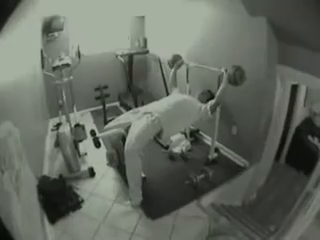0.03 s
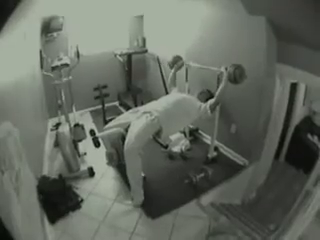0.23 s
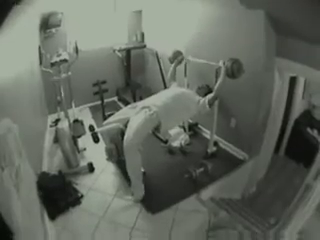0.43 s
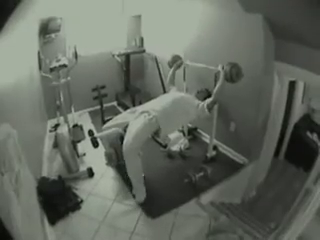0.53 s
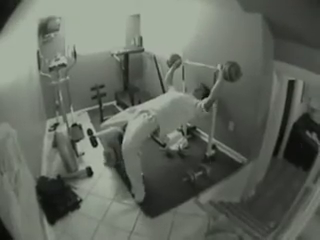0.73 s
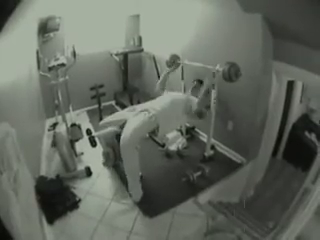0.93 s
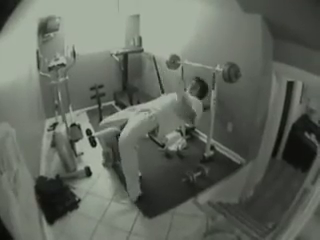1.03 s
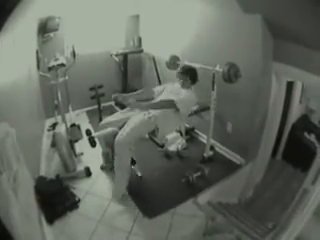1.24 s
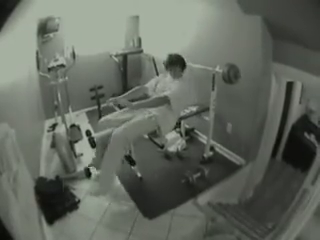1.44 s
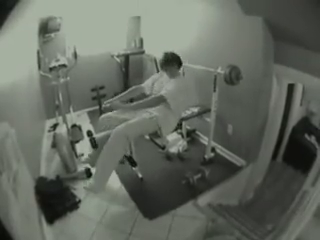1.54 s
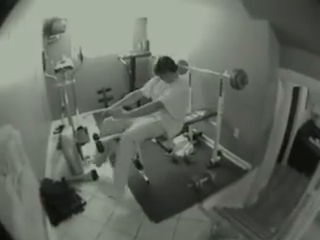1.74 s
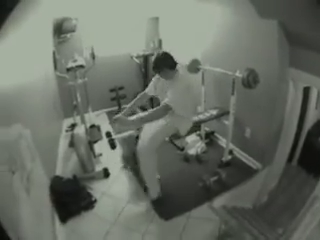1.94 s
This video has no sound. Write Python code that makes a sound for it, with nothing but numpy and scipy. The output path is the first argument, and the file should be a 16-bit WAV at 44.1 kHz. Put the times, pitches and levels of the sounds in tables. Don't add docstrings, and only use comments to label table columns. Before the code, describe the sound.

A heavy barbell slams into steel rack hooks, bouncing and clashing its plates, then rings briefly; cloth slides on a pad and a shoe scuffs and lands on tile, in a small reverberant room, distant microphone.

```python
import sys
import numpy as np
from scipy import signal
from scipy.fft import rfft, irfft, next_fast_len
from scipy.io import wavfile
from scipy.ndimage import uniform_filter1d, minimum_filter1d, map_coordinates

SR = 44100
rng = np.random.default_rng(int(sys.argv[2]) if len(sys.argv) > 2 else 0)


def pcm_store(signal):
    levels = np.round(np.clip(np.atleast_2d(signal), -1, 1) * 32767)
    wavfile.write(sys.argv[1], SR, levels.astype(np.int16).T)


def volts_from_decibels(level):
    exponent = np.asarray(level, float) / 20
    return 10 ** exponent


N = 88200

# (frequency [Hz], width [Hz], level [dB])
HOOK_BODY = [(733, 387, 3.5), (1690, 995, 2), (2630, 485, 4), (3230, 890, -0.5), (4190, 1300, -3),
             (5440, 1100, -7.5), (7100, 2900, -14.5)]
# (frequency [Hz], level [dB], t60 [s])
RACK_MODES = [(95, -18, .12), (231, -9, .12), (330, -10, .1), (500, -9, .1), (605, -9, .15), (651, -9, .15),
              (764, -5, .15), (868, -9, .1), (951, -6, .15), (1023, -7, .15), (1110, -6, .08),
              (1200, -10, .15), (1513, -16, .1), (1814, -14, .1)]
# (frequency [Hz], level [dB], t60 [s])
LARGE_PLATE = [(1780, -13, .12), (1869, 0, .36), (2120, -11, .4), (3280, -20, .4), (3748, -12, .45),
               (3915, -11, .4), (5450, -8, .04), (6078, -20, .3), (7897, -22, .2)]
LARGE_SCATTER_DB = 1


def unit(x):
    return x / np.sqrt(np.mean(x ** 2) + 1e-20)


def along(points, hz):
    f, v = np.transpose(points)
    return np.interp(np.log(hz + 1), np.log(f + 1), v)


def level(rows):
    return volts_from_decibels(np.interp(np.arange(N) / SR, *np.transpose(rows)))


def wobble(rate):
    points = rng.standard_normal(int(N * rate / SR) + 4)
    return map_coordinates(points, [np.arange(N) * rate / SR])


def filtered(x, response):
    m = next_fast_len(x.shape[-1] + SR // 2)
    spectrum = rfft(x, m) * response(np.fft.rfftfreq(m, 1 / SR))
    return irfft(spectrum, m)[..., :x.shape[-1]]


def peaks(table):
    def response(f):
        total = 0
        for k, (centre, width, db) in enumerate(table):
            band = 1j * f * width / (centre ** 2 - f ** 2 + 1j * f * width)
            total = total + (-1) ** k * volts_from_decibels(db) * band
        return total
    return response


def ring(modes, scatter_db=3.5, attack_s=0.0002):
    hz, db, t60 = np.array(modes).T[:, :, None]
    t = np.arange(SR // 2) / SR
    level_luck, pitch_luck = rng.standard_normal((2, len(modes), 1))
    sines = np.sin(2 * np.pi * hz * t * (1 + 0.001 * pitch_luck) + 3 * pitch_luck)
    decays = volts_from_decibels(db + scatter_db * level_luck - 60 * t / t60)
    return (decays * sines).sum(0) * (1 - np.exp(-t / attack_s))


def add(track, s, sound):
    part = track[SR + round(s * SR):][:len(sound)]
    part += sound[:len(part)]


def burst(t60):
    return volts_from_decibels(-60 * np.arange(2000) / SR / t60) * rng.standard_normal(2000)


def snaps_on(rows, gain_db, t60, body):
    out = np.zeros(SR + N)
    for s, db in rows:
        add(out, s, volts_from_decibels(db + gain_db) * burst(t60))
    return filtered(out, peaks(body))


def knocks(rows, modes, attack_s):
    out = np.zeros(SR + N)
    for s, db in rows:
        add(out, s, volts_from_decibels(db - 1.5) * ring(modes, scatter_db=0.5, attack_s=attack_s))
    return out


def paired(pair, alike):
    def split(hz):
        angle = np.arccos(np.clip(along(alike, hz), -1, 1)) / 2
        return np.array([np.cos(angle), np.sin(angle)])
    mid, side = filtered(pair, split)
    return np.array([mid + side, mid - side])


def rush(spectrum, patchy_db, channels=1):
    z = signal.stft(rng.standard_normal((channels, N + 512)), nperseg=512)[2]
    field = uniform_filter1d(rng.standard_normal(z.shape[1:]), 5, 0)
    field = uniform_filter1d(field, 8, 1)
    x = signal.istft(z * volts_from_decibels(patchy_db * unit(field)), nperseg=512)[1][:, :N]
    return unit(filtered(x, lambda hz: volts_from_decibels(along(spectrum, hz))))


def hush():
    # (frequency [Hz], density [dB per Hz])
    air_colour = [(20, -25), (46, 3.5), (80, -11.5), (237, -8), (431, -14), (1880, -20.5), (3250, -26.5),
                  (15000, -39)]
    # (frequency [Hz], likeness [0-1])
    air_alike = [(40, 0.48), (200, 0.96), (1600, 0.54), (5000, 1), (14000, 0.093)]
    t = np.arange(N) / SR
    hum_phase = 2 * np.pi * 290.7 * t + 0.8 * wobble(7.2)
    hum = volts_from_decibels(-48 + 1.2 * wobble(14.5)) * np.sin(hum_phase)
    sing = volts_from_decibels(-46 - 40 * t) * np.sin(2 * np.pi * 3490 * t)
    air = paired(rush(air_colour, patchy_db=1.5, channels=2), air_alike)
    return volts_from_decibels(-46.5 + 3.9 * wobble(4.25)) * air + hum + sing


def hook_blows():
    # (time [s], crack [dB], rack ring [dB], hook ping [dB])
    blows = [(-.04, -15.5, -11, -43), (.151, -1.5, -3, -8), (.255, -27, -13, -14), (.296, -5.5, -7, -9),
             (.318, -9.5, -11, -31), (.374, -7, -14.5, -16.5), (.406, -4, -39, -8), (.449, -5, -19, -38),
             (.454, -6.5, -34, -39), (0.489, -12.5, -22, -37), (.527, -8.5, -15.5, -34),
             (.56, -12.5, -23.5, -31), (.639, -18, -23, -24.5)]
    # (frequency [Hz], level [dB], t60 [s])
    ping = [(2450, 0, .035)]
    cracks, rack, pings = np.zeros((3, SR + N))
    for s, crack_db, rack_db, ping_db in blows:
        add(cracks, s, volts_from_decibels(crack_db + 7) * burst(0.048))
        add(rack, s, volts_from_decibels(rack_db - 7.5) * ring(RACK_MODES, scatter_db=2.5))
        add(pings, s, volts_from_decibels(ping_db) * ring(ping, scatter_db=0))
    return rack + filtered(cracks, peaks(HOOK_BODY)), pings


def plate_clashes():
    # (time [s], large plate [dB], small plate [dB])
    clashes = [
        (-.04, -19.5, -27),
        (0.162, -12, -33),
        (0.256, -17, -30),
        (0.303, -16, -35),
        (.451, 1.5, -12),
        (0.489, -16, -24),
        (0.528, -31, -31),
        (.55, -19, -12.5),
        (.62, -28, -22),
    ]
    # (frequency [Hz], level [dB], t60 [s])
    small_plate = [(2525, -8, .25), (2590, -6, .25), (2650, 0, .3), (3708, -10, .3), (4175, -10, .15),
                   (4786, -6, .25)]
    out = np.zeros(SR + N)
    for s, large_db, small_db in clashes:
        large = volts_from_decibels(large_db - 9.5) * ring(LARGE_PLATE, scatter_db=LARGE_SCATTER_DB)
        small = volts_from_decibels(small_db - 10) * ring(small_plate, scatter_db=5)
        add(out, s, large + small)
    return out


def plate_rattle():
    # (time [s], level [dB])
    chatter_curve = [(0, -43.5), (.14, -90), (.16, -25), (.3, -27), (.44, -26), (.465, -18), (.58, -24.5),
                     (.7, -39), (.85, -48), (1.0, -92)]
    touches_per_s, scatter_db = 900, 3
    touches = (rng.random(N) < touches_per_s / SR) * volts_from_decibels(scatter_db * np.tanh(rng.standard_normal(N)))
    touch_decay = volts_from_decibels(-60 * np.arange(400) / SR / 0.012)
    chatter = np.convolve(touches, touch_decay)[:N] * rng.standard_normal(N)
    chatter = np.pad(unit(chatter) * level(chatter_curve), (SR, 0))
    plate_ring = volts_from_decibels(-6.5) * ring(LARGE_PLATE, scatter_db=LARGE_SCATTER_DB)
    metal = plate_ring + ring(RACK_MODES, scatter_db=1)
    ringing = signal.fftconvolve(chatter, metal)[:SR + N]
    return filtered(volts_from_decibels(10) * chatter, peaks(HOOK_BODY)) + volts_from_decibels(-39.5) * ringing


def frame_rocks():
    # (time [s], level [dB])
    foot_knocks = [(-.01, -25), (.085, -30), (.17, -13), (.21, -33), (.325, -7.5), (.385, -13.5),
                   (.418, -12), (.508, -11), (.588, -13.5), (.648, -19.5), (.79, -45)]
    # (frequency [Hz], level [dB], t60 [s])
    frame_modes = [(183, -12, 0.075), (245, -2.5, 0.078), (335.5, 1.5, 0.057), (361, 0, 0.09),
                   (424.3, 0, 0.051), (690, -6, 0.065)]
    return knocks(foot_knocks, frame_modes, attack_s=0.0019)


def collar_clinks():
    # (time [s], level [dB])
    clinks = [
        (-.01, -39),
        (.153, -18),
        (.17, -25),
        (.3, -21),
        (.495, -16),
        (.525, -13),
        (.645, -28.5),
    ]
    # (frequency [Hz], level [dB], t60 [s])
    collar_modes = [(769, -3.5, 0.28), (1206, 1, 0.08), (973, 2, .1)]
    return knocks(clinks, collar_modes, attack_s=0.0018)


def sparks():
    # (time [s], level [dB])
    edge_hits = [
        (0.1504, -28.5),
        (0.2961, -15.5),
        (0.317, -19),
        (0.3745, -31),
        (0.4066, -26.5),
        (0.4498, -18),
        (.454, -10),
        (0.462, -20.5),
        (0.5285, -29),
    ]
    # (frequency [Hz], width [Hz], level [dB])
    edge_body = [(3700, 360, 5.5), (5440, 1100, 5.5), (8360, 2100, -1), (12400, 2300, -7.5)]
    return snaps_on(edge_hits, 7.5, 0.033, edge_body)


def shaft_settles():
    # (time [s], level [dB])
    settles = [
        (.59, -44),
        (.65, -30.5),
        (.76, -36.5),
    ]
    # (frequency [Hz], level [dB], t60 [s])
    shaft_modes = [(196, -13, 1), (381, -0.5, 0.5), (536, -13, 0.42), (597, -2.5, 0.68), (820, -5, 0.34),
                   (1265, -6, 0.39)]
    return knocks(settles, shaft_modes, attack_s=0.0029)


def ticks():
    # (time [s], peak level [dB])
    snap_times = [
        (.7826, -23),
        (.797, -29),
        (1.2411, -31),
        (1.252, -34),
        (1.3783, -39),
        (1.5848, -28),
        (1.592, -29),
        (1.8866, -42),
        (1.9635, -38),
        (1.975, -40),
    ]
    # (frequency [Hz], width [Hz], level [dB])
    snap_body = [(1024, 240, 8), (4500, 2200, 0.5), (8930, 2300, 5), (11200, 3600, 2)]
    return snaps_on(snap_times, 4, 0.012, snap_body)


def cloth_slide():
    # (time [s], level [dB])
    rub_curve = [(.15, -73), (.75, -45), (.9, -53.5), (1.02, -42), (1.04, -34.5), (1.15, -38), (1.3, -42),
                 (1.38, -55), (1.5, -61), (1.6, -36.5), (1.93, -43.5), (2, -12)]
    # (frequency [Hz], density [dB per Hz])
    cloth_colour = [(88, -51), (150, -19), (289, -8), (318, -15), (556, -12), (661, -15.5), (1400, -15),
                    (5200, -23.5), (15000, -36)]
    grain_db = 1.2
    grain = volts_from_decibels(grain_db * wobble(39.46))
    cloth = level(rub_curve) * grain * rush(cloth_colour, patchy_db=grain_db)[0]
    return np.pad(volts_from_decibels(-3.5) * cloth, (SR, 0))


def footfall():
    # (time [s], level [dB])
    steps = [(1.275, -30), (1.49, -43), (1.53, -28.5), (1.59, -25.5), (1.667, -22), (1.679, -18),
             (1.689, -12.5), (1.698, -14), (1.71, -13), (1.728, -12.5), (1.74, -20), (1.76, -26),
             (1.775, -28), (1.79, -28), (1.81, -55), (1.89, -44)]
    # (frequency [Hz], level [dB], t60 [s])
    slab_modes = [(75.4, -6.5, 0.045), (98, -9, 0.053), (129, -3.5, 0.027), (175, 0, 0.06),
                  (215, -0.5, 0.05), (335, -1.5, .04), (428, -1.5, 0.025), (522, -7.5, 0.029),
                  (653, -6, 0.038), (778, -7, 0.024), (1016, -7.5, 0.013)]
    # (time [s], level [dB])
    sways = [
        (1.69, -38),
        (1.77, -32),
        (1.88, -41),
    ]
    # (frequency [Hz], level [dB], t60 [s])
    joist_modes = [(46.6, 0, .3), (69.6, -2, 0.16)]
    return knocks(steps, slab_modes, attack_s=0.0018) + knocks(sways, joist_modes, attack_s=0.013)


def sole_scuff():
    # (time [s], level [dB])
    scuff_curve = [(1.44, -58.5), (1.49, -45), (1.54, -39), (1.6, -34), (1.65, -37.5), (1.7, -43.5),
                   (1.76, -44), (1.84, -46.5), (1.9, -53)]
    # (frequency [Hz], width [Hz], level [dB])
    pressed_body = [(310, 130, -4), (856, 110, 0), (1234, 80, -5), (1670, 71, -1), (1870, 120, 0.5),
                    (2194, 144, 3), (3020, 190, 1.5), (4500, 200, -14)]
    # (frequency [Hz], width [Hz], level [dB])
    skim_body = [(336, 66, -2.5), (577, 64, 0.5), (760, 80, -2.5), (1800, 90, -14), (2070, 90, -8.5),
                 (2790, 49, -4.5), (7500, 300, -21)]
    # (frequency [Hz], density [dB per Hz])
    drag_colour = [(88, -39), (150, -19), (649, -1), (757, -8), (833, 2), (3030, -0.5), (12100, -25),
                   (15000, -56)]
    slips = rng.standard_normal(N) * volts_from_decibels(2.5 * wobble(150))
    press_s, press_span_s = 1.545, 0.03
    press = 0.5 + 0.5 * np.tanh((np.arange(N) / SR - press_s) / press_span_s)
    pressed = unit(filtered(slips, peaks(pressed_body)))
    skimming = unit(filtered(slips, peaks(skim_body)))
    squeak = level(scuff_curve) * (press * pressed + (1 - press) * skimming)
    drag = level(scuff_curve) * volts_from_decibels(-4) * rush(drag_colour, patchy_db=3.5)[0]
    return np.pad(squeak + drag, (SR, 0)), squeak


def room(x, size=4410):
    # (frequency [Hz], t60 [s])
    reverb_t60 = [(100, 0.21), (500, 0.44), (2000, 0.45), (6000, 0.38), (14000, 0.1)]
    # (frequency [Hz], likeness [0-1])
    tail_alike = [(60, .6), (200, .9), (700, .75), (2000, .65), (5000, .45), (8000, .1), (14000, .2)]
    wet_db, gap_s = 1, 0.003
    out = np.zeros((2, len(x) + SR))
    window = np.hanning(2 * size + 1)[:-1]
    for start in range(SR - 2 * size, len(x) - size, size):
        hz, t, z = signal.stft(rng.standard_normal((2, SR // 2)), SR, nperseg=256)
        decay = volts_from_decibels(-60 * t / along(reverb_t60, hz)[:, None])
        tail = paired(signal.istft(z * decay, SR, nperseg=256)[1], tail_alike)
        tail = volts_from_decibels(wet_db) * tail / np.linalg.norm(tail[0])
        tail = np.pad(tail, ((0, 0), (round(gap_s * SR) + 1, 0)))
        tail[:, 0] = 1
        piece = x[start:start + 2 * size]
        wet = signal.fftconvolve((piece * window[:len(piece)])[None], tail, axes=1)
        out[:, start:start + wet.shape[1]] += wet
    return out[:, SR:SR + N]


def scene():
    clatter, pings = hook_blows()
    plates = pings + plate_clashes()
    steel = clatter + plate_rattle() + volts_from_decibels(-10) * plates + frame_rocks() + collar_clinks() + sparks()
    shaft, snaps = shaft_settles(), ticks()
    scuff, squeak = sole_scuff()
    near = steel + snaps + cloth_slide() + footfall() + scuff
    direct = volts_from_decibels(-8) * snaps + volts_from_decibels(-4) * plates + shaft
    return volts_from_decibels(-3.5) * room(near) + direct[SR:] + volts_from_decibels(-10) * squeak + hush()


def low_pass(x):
    return signal.sosfilt(signal.butter(12, 15310, fs=SR, output="sos"), x)


def record(dry):
    # (frequency [Hz], difference [dB])
    lean = [(40, 8.5), (380, 8.5), (700, 5.5), (1300, 3.5), (2400, 2.5), (8000, 2), (14700, .5)]
    # (frequency [Hz], lead [radians])
    lead = [(100, 0), (900, -.6), (7000, -.3), (9200, 3.1), (11000, 3.9), (12000, 5.2), (15000, 5.4)]
    # (frequency [Hz], level [dB])
    mic_treble = [(5000, 0), (8000, -1), (11000, -2), (12500, -6.5), (14500, -9), (15300, -37)]

    def ports(hz):
        half = volts_from_decibels(along(lean, hz) / 2) * np.exp(0.5j * along(lead, hz))
        low_cut = hz / np.hypot(hz, 30)
        return np.array([half, 1 / half]) * (hz < 15300) * volts_from_decibels(along(mic_treble, hz)) * low_cut

    x = filtered(dry, ports)
    ceiling, hold_s = 1, 0.025
    need = np.minimum(1, ceiling / (np.abs(x).max(0) + 1e-9))
    span = round(hold_s * SR) + 3
    x = x * uniform_filter1d(minimum_filter1d(need, span), span // 2)
    mute_s, mute_hz = (0.133, 0.137, 0.148, 0.1495), 1100
    t = np.arange(N) / SR
    before = x * (t < mute_s[-1])
    treble = filtered(before, lambda hz: np.clip(hz / mute_hz - 1, 0, 1))
    x = x - np.interp(t, mute_s, [0, 1, 1, 0]) * treble
    return low_pass(x)


dry = scene()
out = record(dry)
pcm_store(out)
```